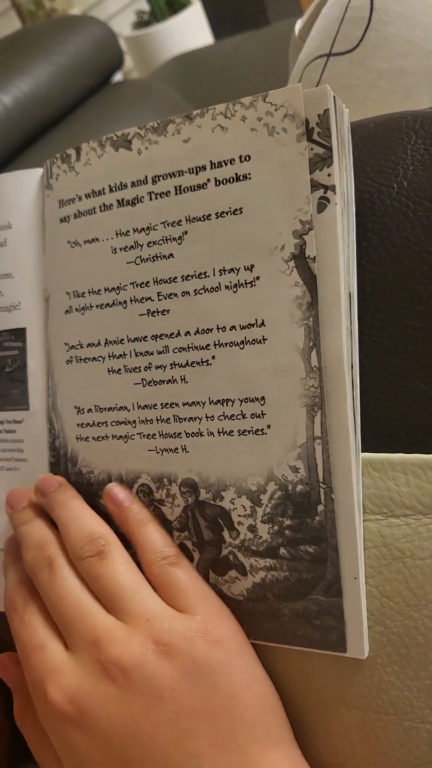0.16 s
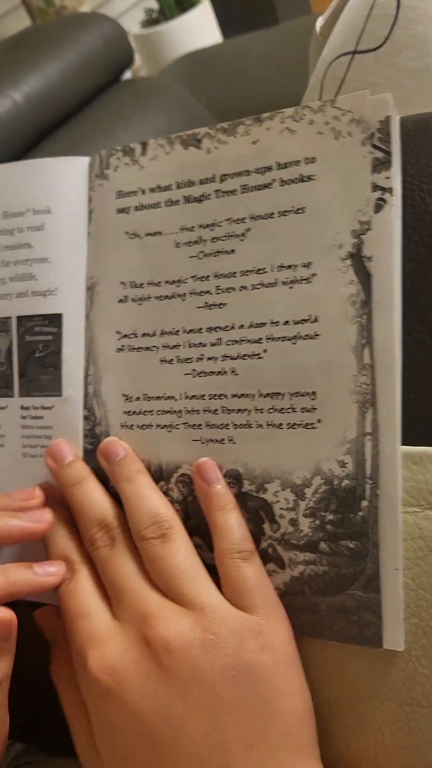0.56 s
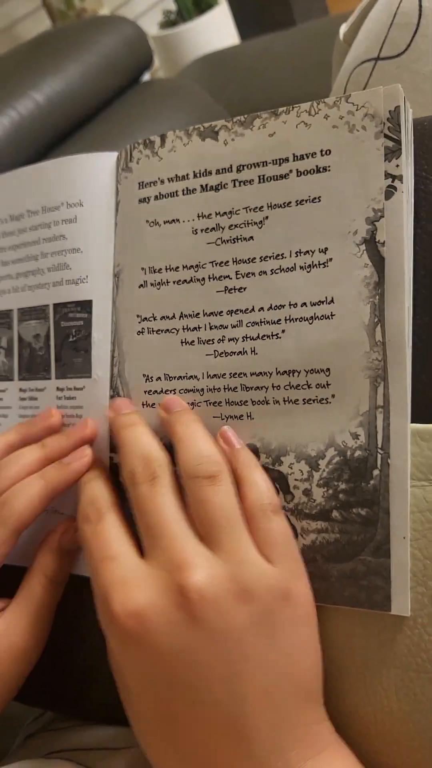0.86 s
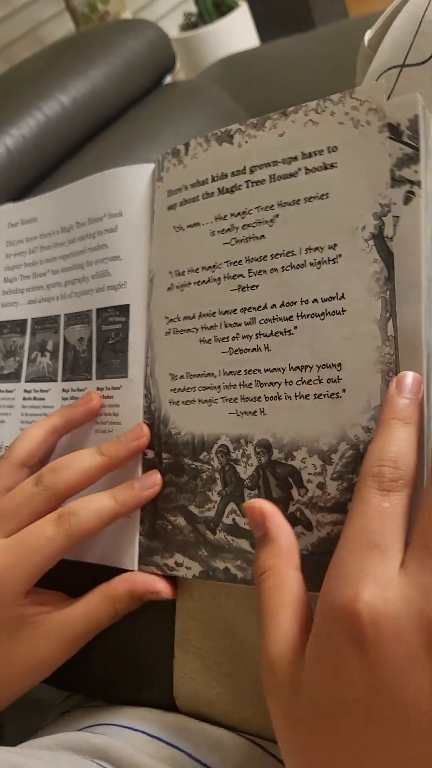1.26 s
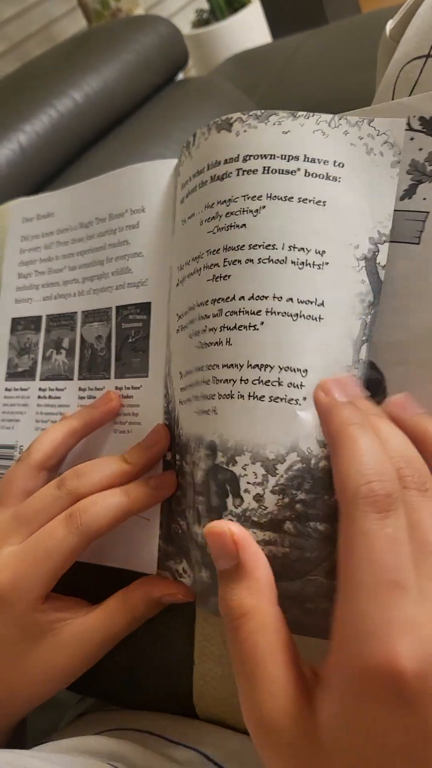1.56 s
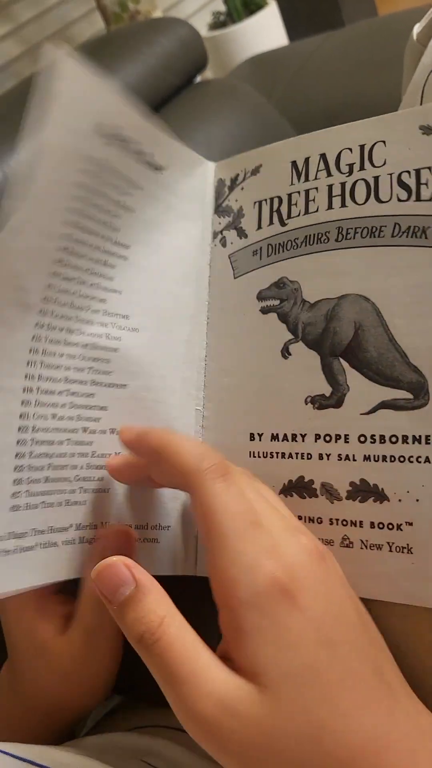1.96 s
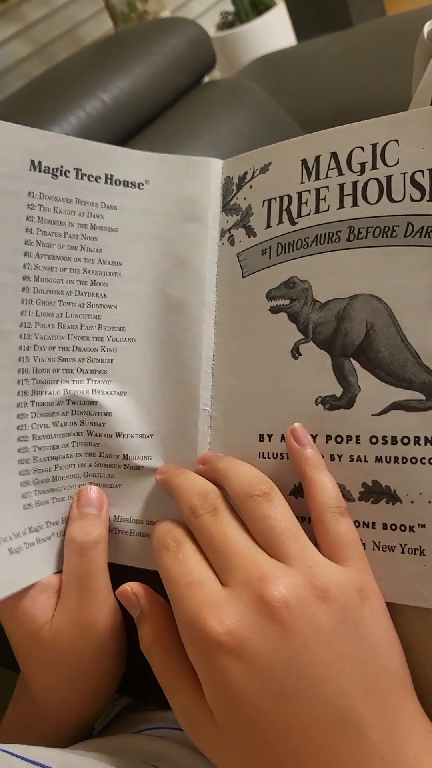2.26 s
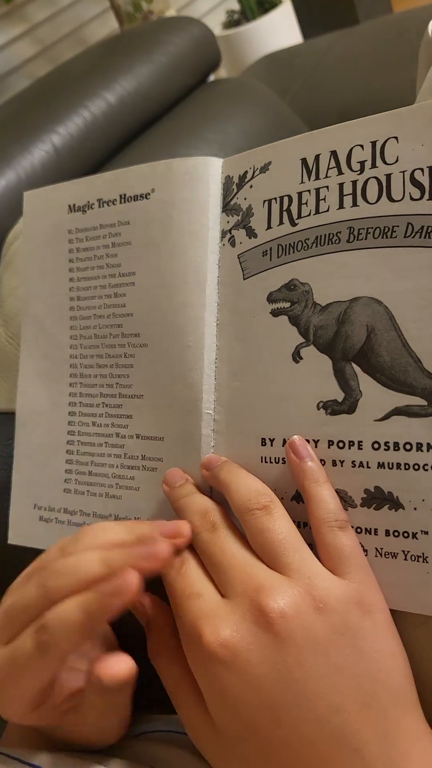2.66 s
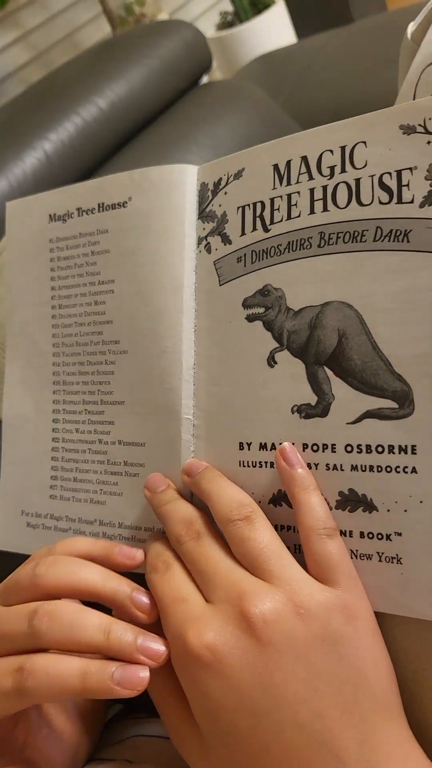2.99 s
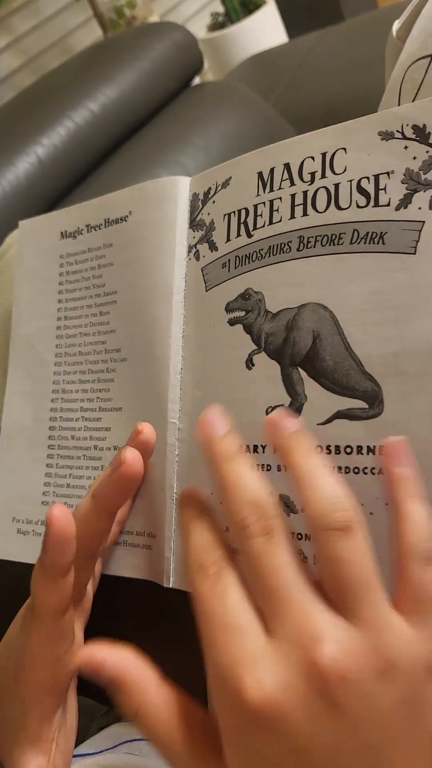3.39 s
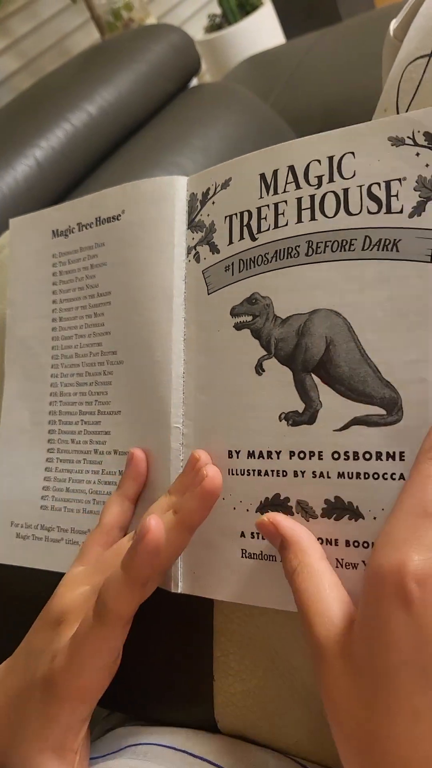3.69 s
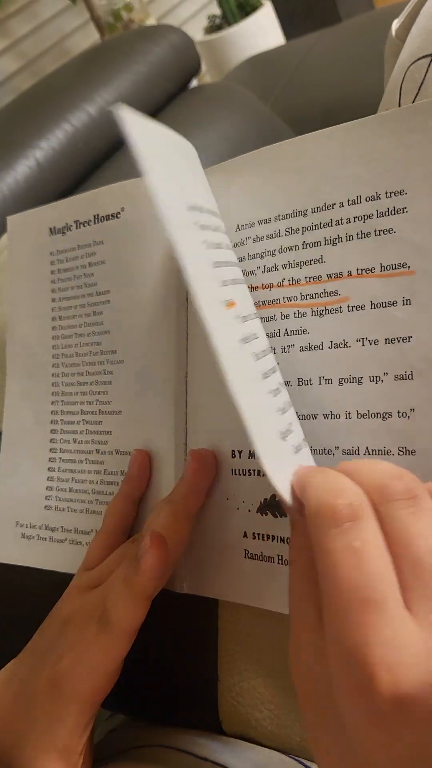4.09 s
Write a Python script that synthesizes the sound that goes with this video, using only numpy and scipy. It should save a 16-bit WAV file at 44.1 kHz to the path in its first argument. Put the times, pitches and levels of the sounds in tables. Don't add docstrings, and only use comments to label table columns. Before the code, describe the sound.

A small paperback is handled near the microphone. Muffled thumps and light rustles come first, then a gritty finger stroke and sparse ticks. A sheet buckles sharply and flaps over in a dense burst of crisp cracks, settles with more snaps, then only soft skin-on-paper slides and a final page lift remain over low room hum and a short reverberation.

```python
import sys
import numpy as np
from scipy import signal
from scipy.fft import rfft, irfft, next_fast_len
from scipy.io import wavfile
from scipy.ndimage import uniform_filter1d, map_coordinates

SR = 44100
rng = np.random.default_rng(int(sys.argv[2]) if len(sys.argv) > 2 else 0)


def transcribe(signal):
    frames = np.atleast_2d(signal).T
    limited = np.clip(frames, -1, 1)
    pcm = np.round(limited * 32767).astype(np.int16)
    wavfile.write(sys.argv[1], SR, pcm)


def boost_factor(decibels):
    exponent = np.asarray(decibels, float) / 20
    return 10 ** exponent


N = 186631

# time_s, level_db
GRIP_RUMBLE = [(0.0, -41.5), (0.13, -48), (1.4, -55), (1.57, -55), (1.72, -51.5), (2.07, -49.5),
               (2.38, -49.5), (2.76, -57.5), (2.99, -58), (3.24, -55.5), (3.51, -58), (3.71, -60),
               (3.93, -56.5), (4.23, -57)]
# freq_hz, density_db_per_hz
BOOK_SPECTRUM = [(79, -20), (135, -3.5), (151, -11), (178, -7), (302, -11.5), (500, -23.5), (650, -29),
                 (1100, -120)]
AIR_SPECTRUM = [(13, -46), (22, -44), (59, 2), (92, -5.5), (95, 7), (105, -17), (140, -39), (230, -120)]
# freq_hz, rms_db
HUM_PARTIALS = [(120.4, -51), (240.8, -72.5)]
AIR_DB, AIR_GRIP_SHARE = -60.5, 0.82

# freq_hz, density_db_per_hz
RASP_SPECTRUM = [(760, -26), (1300, -2.5), (1500, -4.5), (1920, 1.5), (2410, 3.5), (3130, -0.5), (3950, -4),
                 (4630, -4.5), (5600, -12), (7280, -27), (12300, -120)]
BODY_SPECTRUM = [(250, -36.5), (420, 1.5), (562, 0), (831, 5), (1200, -1), (1600, 0), (2080, -14.5),
                 (3520, -120)]
FIZZ_SPECTRUM = [(3060, -7.5), (5200, -3.5), (6060, -1.5), (7470, 0.5), (9090, -2), (9830, -1.5),
                 (12400, -1.5), (15200, -4.5), (15800, -9.5)]
# start_s, length_s, rasp_db, body_re_rasp_db, fizz_re_rasp_db
SHEET_DRAGS = [(.001, 0.14, -55.5, 11, -4.5), (.2, 0.15, -68, 9, 0), (.339, 0.019, -59.5, 2, 11.5),
               (.43, .02, -46.5, 4, -4), (.81, 0.074, -64, 0, 11.5), (.9, 0.2, -66, 7, 8.5),
               (1.14, 0.033, -66.5, -17, 9), (1.222, 0.041, -66.5, 8, 13.5),
               (3.888, 0.082, -44.5, -14.5, -7), (1.343, 0.071, -47.5, -2.5, -1),
               (1.73, 0.034, -51.5, 0.5, 6.5), (1.825, 0.12, -49, -7, 1), (1.91, 0.099, -43.5, 6, -5),
               (2.06, 0.17, -55, 8, 2.5), (2.3, .09, -44.5, 2, -4.5)]
# start_s, length_s, rasp_db, body_re_rasp_db, fizz_re_rasp_db
FINGER_STROKES = [(.4495, 0.057, -35, -2.5, -3.5), (.56, 0.095, -53, 6, 1), (1.447, 0.083, -35, -5, -1.5),
                  (2.4, 0.044, -46, -6.5, 0), (2.495, 0.073, -38, -4.5, -4), (2.65, 0.17, -45.5, -8.5, -1),
                  (2.755, 0.043, -49.5, -11, 6.5), (2.84, 0.037, -46, -8.5, 1.5),
                  (3.23, 0.11, -52.5, 2.5, -2.5), (3.3, .05, -44.5, -19, -1.5),
                  (3.595, 0.022, -47.5, -30, 2), (4.1, 0.031, -48.5, -7, -5), (4.16, 0.036, -55.5, -6, 5.5)]
# start_s, length_s, rasp_db, body_re_rasp_db, fizz_re_rasp_db
FINGER_GLIDES = [
    (.63, 0.017, -49, 2, -4),
    (.69, 0.13, -61, 12, -6),
    (1.03, .1, -57, -20, 11),
    (1.58, 0.027, -51, 6, 5),
    (2.17, 0.1, -50.5, -3, 13),
    (2.99, 0.077, -45.5, -4.5, -3.5),
    (3.44, 0.066, -49.5, -2.5, 1),
    (3.98, 0.073, -44.5, -6.5, -0.5),
]
GRIP_RATIOS = (0.63, 0.98, 1.76)
FADE_RATIOS = (0.83, 1, 1.11)

# freq_hz, width_hz, level_db
SHEET_MODES = [(644, 410, 1), (1250, 1250, 2), (1600, 610, 3.5)]
CORNER_MODES = [(700, 1020, -7), (1630, 480, 0.5), (2350, 420, -7.5)]
# start_s, peak_db, body_re_peak_db,
# treble_re_peak_db
SNAPS_NEAR = [(.0137, -32, 3.5, -16.5), (.0354, -42.5, 9.5, -11), (.1299, -32.5, -2, -22),
              (.415, -36.5, -35, -9), (.857, -25.5, -15, -15.5), (1.3429, -22.5, -20.5, -19),
              (1.443, -13.5, -32, -30.5), (1.9658, -5.5, -71, -31), (2.108, -28, -29, -19.5),
              (2.232, -39, 5.5, -16), (2.275, -31, 2, -23), (2.293, -42.5, 12.5, -17),
              (2.3159, -21, -13.5, -22), (3.224, -41, 1.5, -13), (1.334, -53, 3, -23)]
SNAPS_FAR = [(.0449, -27, 5, -7), (.1164, -40, 10.5, -20), (.126, -32.5, -0.5, -10), (.142, -39, -25, 0.5),
             (.196, -24.5, -15.5, -27), (.5522, -33, -8, -18), (1.6147, -33, -11, -7),
             (1.732, -21, -32, -18), (1.8229, -17, -9, -34), (1.94, -21, -21, -8),
             (1.998, -15.5, -4.5, -11), (2.7677, -34, -19, -6), (3.2001, -34.5, -9, -18)]
# start_s, peak_db, body_re_peak_db, treble_re_peak_db
CRUMPLES_NEAR = [(.049, -28, 6, -14), (.0828, -25, -1, -1), (1.371, -24, -13, -19), (1.7492, -27.5, -5, -4),
                 (1.8444, -12, -7, 3), (1.8486, -1, -44, 0), (1.9486, -10, -15, -6),
                 (1.9574, -9.5, -9, -22), (1.9918, -10, -10, -38), (2.1448, -43.5, 19.5, -31),
                 (2.3312, -14, -8, -28)]
CRUMPLES_FAR = [(.0162, -29, 1, -15), (.0384, -22, 5, -1), (.1348, -44, -15, -13), (.1485, -37, 16, -24),
                (.1565, -45, 1, -19), (.066, -44, 8, -20), (.093, -51, 4, -20), (2.012, -36, 4, -20),
                (1.8228, -33, 4, -39.5), (1.8542, 0.2, -14, -27), (1.8674, -28, 9, -20),
                (1.9354, -10, -33.5, -10), (1.9444, -9.5, -3.5, -17), (1.9727, -13.5, -9.5, -27),
                (2.0296, -35, 3.5, -10), (2.3414, -12, -8, -20), (2.3504, -33, 4, -30),
                (1.088, -24, -18, -14), (1.103, -28.5, -16, -2)]
# start_s, peak_db, body_re_peak_db, treble_re_peak_db
CORNER_CRACKS = [
    (.4298, -26, -13, -10),
    (1.357, -25, -20, -24.5),
    (2.1986, -13, -5, -30),
    (2.3093, -14, 1, 2),
    (2.337, -12, -5, -8),
    (4.0896, -16.5, -10, -39),
    (1.8492, -19, -3, -10),
]
NEAR_PAN_DB, FAR_PAN_DB = -11, -2
# freq_hz, gain_db
PORT_RESPONSE = [(4800, 0), (6100, -6), (8000, 2.5), (10000, -1.5), (12500, -4), (15000, -4.5)]

# start_s, peak_db, pitch_hz
BLOCK_TAPS = [(0.018, -36, 183), (.044, -28, 273), (.048, -17.5, 163), (.062, -25, 229), (.114, -23.5, 217),
              (0.13, -28.5, 199), (.144, -22, 229), (0.298, -34, 178), (0.43, -33.5, 145),
              (0.443, -29.5, 185), (0.551, -27.5, 164), (.694, -32, 286), (.851, -28, 170),
              (1.002, -33.5, 143), (1.191, -40.5, 145), (1.337, -28, 202), (1.344, -27.5, 144),
              (1.384, -27.5, 144), (1.437, -27.5, 144), (1.729, -26, 147), (1.845, -27.5, 161),
              (1.954, -21.5, 278), (1.974, -21.5, 146), (1.989, -25, 217), (2.107, -28.5, 145),
              (2.147, -31.5, 155), (2.287, -25, 231), (2.306, -20, 198), (2.337, -30, 183),
              (3.227, -36.5, 145)]
# freq_hz, t60_s
ROOM_T60 = [(200, 0.1), (2000, 0.26), (10000, 0.074)]


def unit(x):
    return x / np.sqrt(np.mean(x ** 2) + 1e-20)


def along(points, hz):
    point_hz, value = np.transpose(points)
    return np.interp(np.log(hz + 1), np.log(point_hz + 1), value)


def wobble(rate_hz):
    knots = rng.standard_normal(int(N * rate_hz / SR) + 4)
    return map_coordinates(knots, [np.arange(N) * rate_hz / SR])


def filtered(x, response):
    size = next_fast_len(N + SR // 2)
    spectrum = rfft(x, size) * response(np.fft.rfftfreq(size, 1 / SR))
    return irfft(spectrum, size)[..., :N]


def ports(x, lag_s):
    lags_s = np.array([[0], [lag_s]])
    return filtered(np.array([x, x]), lambda hz: np.exp(-2j * np.pi * hz * lags_s))


def noise(spectrum, alike, grit_db=0):
    raw = rng.standard_normal((3, N)) * boost_factor(grit_db * wobble(900))
    share = np.clip(alike, 0, 1)
    pair = np.sqrt(share) * ports(raw[0], lag_s=0.00017) + np.sqrt(1 - share) * raw[1:]
    return unit(filtered(pair, lambda hz: boost_factor(along(spectrum, hz))))


def sides(pan_db):
    return boost_factor(np.array([pan_db / 2, -pan_db / 2]))


def background():
    t = np.arange(N) / SR
    book_db = np.interp(t, *np.transpose(GRIP_RUMBLE))
    air_db = AIR_DB + AIR_GRIP_SHARE * (book_db - book_db.mean())
    tremor_db = 2.3 * wobble(17)
    book = boost_factor(book_db + 1.5 + tremor_db) * noise(BOOK_SPECTRUM, alike=0.98)
    air = boost_factor(air_db + 3.0 + 3.6 * wobble(3.8)) * noise(AIR_SPECTRUM, alike=0.82)
    drift_rad = 0.5 * wobble(4.6) + np.c_[[0.12, -0.12]]
    unsteady_db = 1.5 * wobble(14)
    hum = 0
    for hz, rms_db in HUM_PARTIALS:
        level = np.sqrt(2) * boost_factor(rms_db + 1.06 * wobble(6.88) + unsteady_db)
        hum = hum + level * np.sin(2 * np.pi * hz * t + drift_rad)
    hiss_spectrum = [(300, -4.5), (1500, 3), (2600, 2.5), (5500, -4), (15000, -8.5)]  # hz, db
    hiss = boost_factor(-58.5) * noise(hiss_spectrum, alike=0)
    return (book + air + hum) * sides(-2.2)[:, None] + hiss


def stroke_power(rows, attack_s, sag_db_per_s, lift_db_per_s):
    t = np.arange(SR // 2) / SR
    power = np.full((3, N + len(t)), 1e-10)
    grip = 1 - np.exp(-t / (attack_s * np.c_[list(GRIP_RATIOS)]))
    for start_s, length_s, rasp_db, body_db, fizz_db in rows:
        sag_db = sag_db_per_s * np.minimum(t, length_s)
        lift_db = lift_db_per_s * np.maximum(t - length_s, 0)
        level_db = rasp_db + np.c_[[0, body_db, fizz_db]] - np.outer(FADE_RATIOS, sag_db + lift_db)
        power[:, round(start_s * SR):][:, :len(t)] += (grip * boost_factor(level_db)) ** 2
    return power[:, :N]


def patches(x, patchy_db):
    z = signal.stft(x, nperseg=512)[2]
    field = rng.standard_normal(z.shape[1:])
    for _ in range(2):
        field = uniform_filter1d(field, size=10, axis=0)
        field = uniform_filter1d(field, size=12, axis=1)
    return signal.istft(z * boost_factor(patchy_db * unit(field)), nperseg=512)[1][:, :N]


def slide():
    power = stroke_power(FINGER_STROKES, attack_s=0.002, sag_db_per_s=49.5, lift_db_per_s=108.5)
    power = power + stroke_power(SHEET_DRAGS, attack_s=0.0075, sag_db_per_s=-10.5, lift_db_per_s=234)
    power = power + stroke_power(FINGER_GLIDES, attack_s=0.026, sag_db_per_s=39, lift_db_per_s=105)
    rasp_db, body_db, fizz_db = 10 * np.log10(power)
    flutter_db = 0.8 * wobble(40) + 0.8 * wobble(90)
    rustle_db = 2.2 * wobble(45)
    rasp = boost_factor(rasp_db + 1.5 + flutter_db) * noise(RASP_SPECTRUM, alike=0.15, grit_db=0.0)
    body = boost_factor(body_db - 2.0 + rustle_db) * noise(BODY_SPECTRUM, alike=0.43, grit_db=-2.5)
    fizz = boost_factor(fizz_db + 3.5 + flutter_db) * noise(FIZZ_SPECTRUM, alike=0.04, grit_db=0.5)
    mix = (rasp + fizz) * sides(-5.0)[:, None] + body * sides(-1.9)[:, None]
    return patches(mix, patchy_db=1.3)


def bending_response(modes, hz):
    total = 0
    for k, (centre_hz, width_hz, level_db) in enumerate(modes):
        damping = 1j * hz * width_hz
        total = total + (-1) ** k * boost_factor(level_db) * damping / (centre_hz ** 2 - hz ** 2 + damping)
    return total


def band(x, lo_hz, hi_hz):
    return signal.sosfilt(signal.butter(2, [lo_hz, hi_hz], "band", fs=SR, output="sos"), x)


def buckles(events, modes, kick, rise_s, grit_db, mid_db, body_db, treble_db):
    t = np.arange(SR // 16) / SR
    spread = np.array([0.3, 0.6, 0.7])[:, None, None]
    drive = np.zeros((3, 2, N + len(t)))
    for start_s, peak_db, low_db, high_db, pan_db, t60_s in events:
        shape = (1 - np.exp(-t / rise_s)) * boost_factor(peak_db - 60 * t / np.clip(t60_s, 0.002, 0.2))
        size = np.linalg.norm(shape)
        clumps = boost_factor(grit_db * np.repeat(rng.standard_normal(len(t) // 16 + 1), 16)[:len(t)])
        shared = rng.standard_normal((3, 1, len(t)))
        own = rng.standard_normal((3, 2, len(t)))
        cracks = shape * clumps * (shared + spread * own)
        cracks[:2, :, 4] -= kick * size
        cracks *= size / np.linalg.norm(cracks, axis=2, keepdims=True)
        pans = sides(np.clip(pan_db, -13, 3) * np.array([0.6, 1, 1.1])).T
        gains = boost_factor([[low_db + body_db], [mid_db], [high_db + treble_db]]) * pans
        first = round(start_s * SR)
        drive[:, :, first:first + len(t)] += gains[:, :, None] * cracks
    low = filtered(drive[0, :, :N], lambda hz: bending_response(modes, hz))
    high = band(drive[1, :, :N], 2200, 4260) + band(drive[2, :, :N], 3700, 20000)
    right = ports(low[1], lag_s=0.0001)[1] + ports(high[1], lag_s=0.00016)[1]
    return np.array([low[0] + high[0], right])


def placed(events, pan_db, t60_s):
    return [(*row, pan_db, t60_s) for row in events]


def crumples():
    events = placed(CRUMPLES_NEAR, NEAR_PAN_DB, t60_s=0.027) + placed(CRUMPLES_FAR, FAR_PAN_DB, t60_s=0.028)
    return buckles(events, SHEET_MODES, kick=0.12, rise_s=0.0026, grit_db=5.5,
                   mid_db=4.5, body_db=16, treble_db=-4.5)


def snaps():
    events = placed(SNAPS_NEAR, NEAR_PAN_DB, t60_s=0.02) + placed(SNAPS_FAR, FAR_PAN_DB, t60_s=0.0098)
    return buckles(events, CORNER_MODES, kick=0.43, rise_s=0.0001, grit_db=7.5,
                   mid_db=-1, body_db=15.5, treble_db=12.5)


def taps():
    out, t = np.zeros(N + SR), np.arange(SR // 4) / SR
    cycles_to_t60 = 4.9
    for start_s, peak_db, pitch_hz in BLOCK_TAPS:
        swing = np.sin(2 * np.pi * pitch_hz * t) * boost_factor(-60 * t / (cycles_to_t60 / pitch_hz))
        knock = 0.55 * np.sin(2 * np.pi * 1.73 * pitch_hz * t) * boost_factor(-60 * t / 0.014)
        heave = boost_factor(-11.5 - 60 * t / 0.061) * np.sin(2 * np.pi * 62 * t)
        push = boost_factor(peak_db + 2.0) * (1 - np.exp(-t / 0.0003))
        out[round((start_s + 0.003) * SR):][:len(t)] -= push * (swing + knock + heave)
    radiated = filtered(out[:N], lambda hz: (1j * hz / 55) ** 2 / (1 + 1j * hz / 55) ** 2)
    return radiated * sides(-5.0)[:, None]


def corner_cracks():
    events = placed(CORNER_CRACKS, NEAR_PAN_DB, t60_s=0.0072)
    return buckles(events, CORNER_MODES, kick=0.53, rise_s=0.00033, grit_db=4.5,
                   mid_db=0.5, body_db=19.5, treble_db=10.0)


def room(x):
    hz, t, z = signal.stft(rng.standard_normal((2, SR // 2)), SR, nperseg=256)
    decay = boost_factor(-60 * t / along(ROOM_T60, hz)[:, None])
    tail = signal.istft(z * decay, SR, nperseg=256)[1]
    delayed = np.pad(x, ((0, 0), (200, 0)))
    return signal.fftconvolve(delayed, tail / np.linalg.norm(tail[0]), axes=1)[:, :N]


def scene():
    pages = snaps() + crumples() + corner_cracks()
    pages = filtered(pages, lambda hz: boost_factor(along(PORT_RESPONSE, hz)))
    thuds = taps()
    reverb = room(boost_factor(-16.5) * pages + boost_factor(-7.5) * thuds)
    return pages + thuds + reverb + slide() + background()


def band_limit(x):
    return signal.sosfilt(signal.butter(12, 16970, fs=SR, output="sos"), x)


def record(dry):
    top_hz = 15850
    soft = dry / (1 + np.abs(dry / 0.85) ** 4) ** (1 / 4)
    mix = filtered(soft, lambda hz: hz < top_hz)
    return band_limit(mix)


dry = scene()
out = record(dry)
transcribe(out)
```